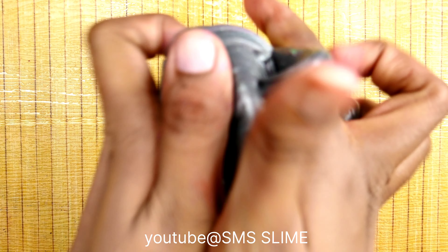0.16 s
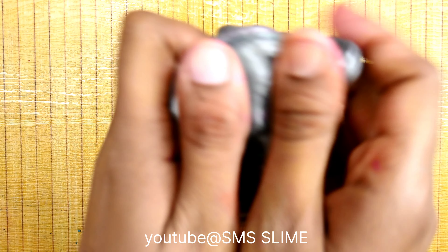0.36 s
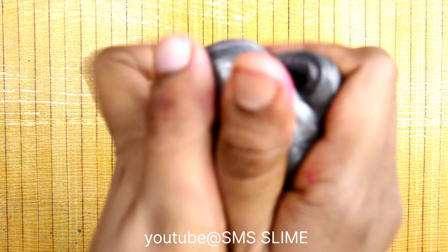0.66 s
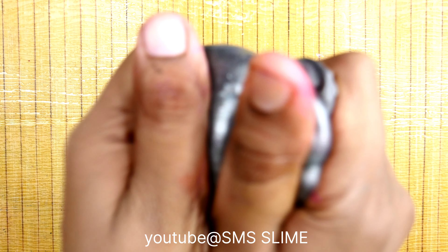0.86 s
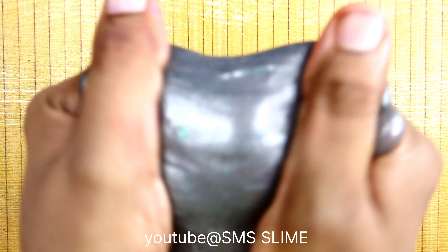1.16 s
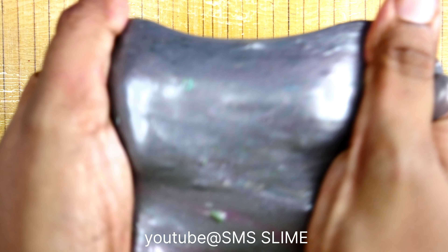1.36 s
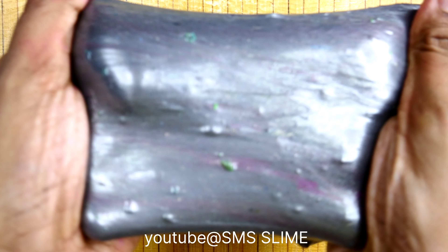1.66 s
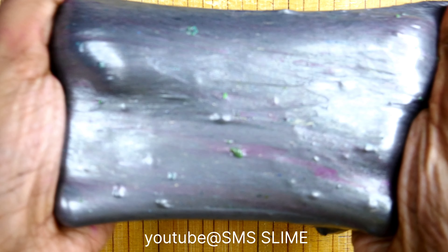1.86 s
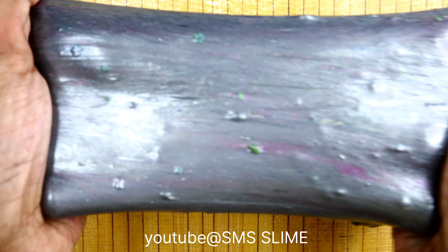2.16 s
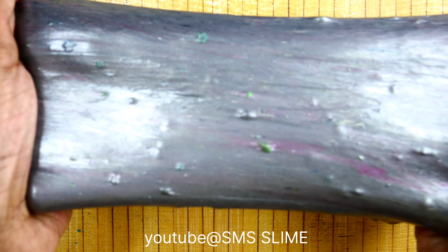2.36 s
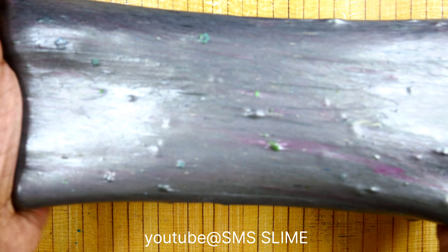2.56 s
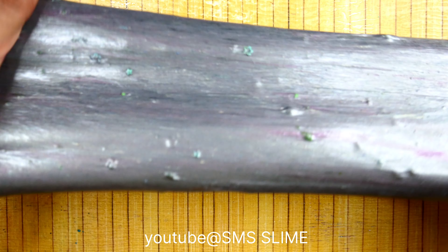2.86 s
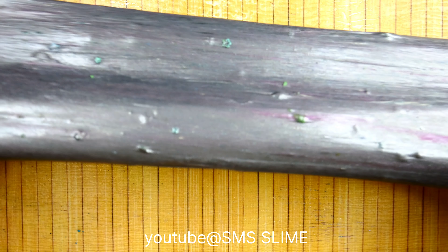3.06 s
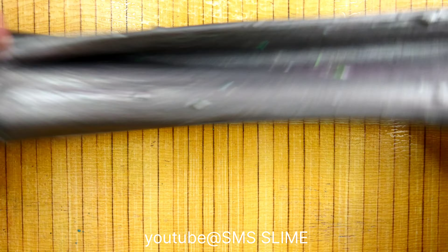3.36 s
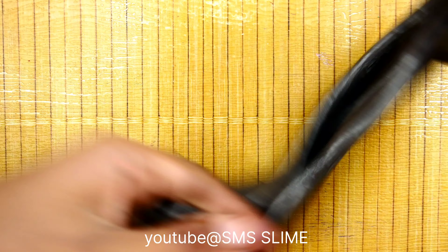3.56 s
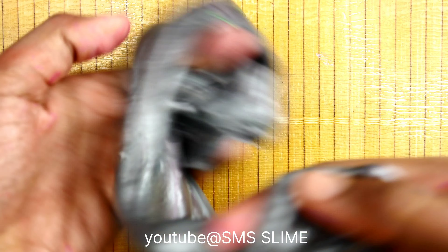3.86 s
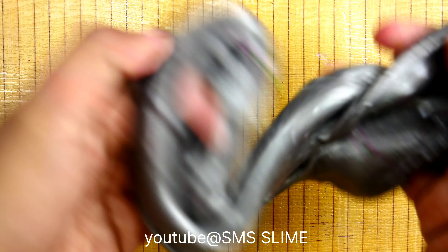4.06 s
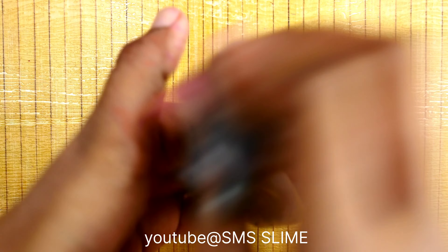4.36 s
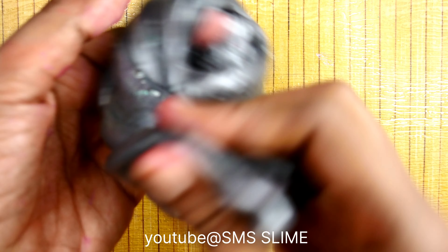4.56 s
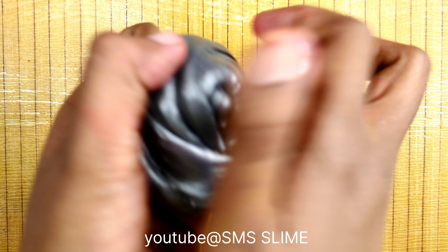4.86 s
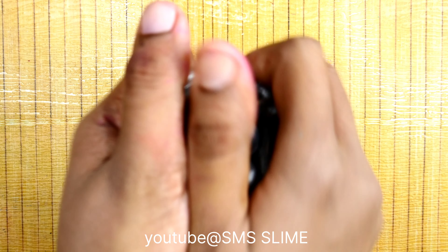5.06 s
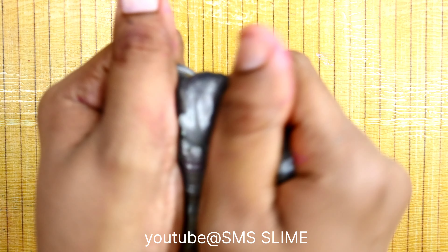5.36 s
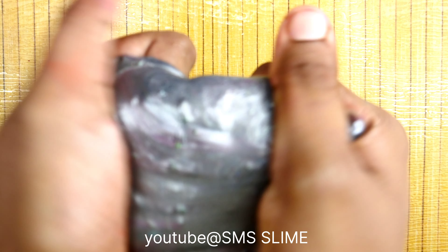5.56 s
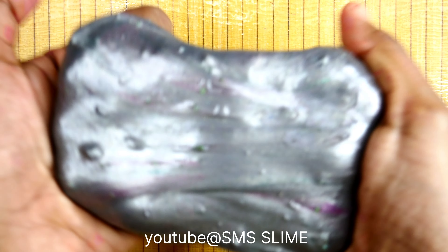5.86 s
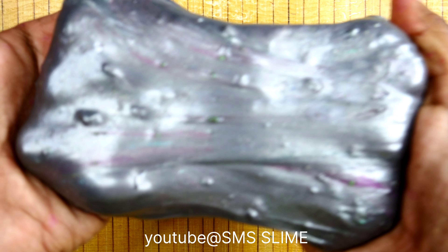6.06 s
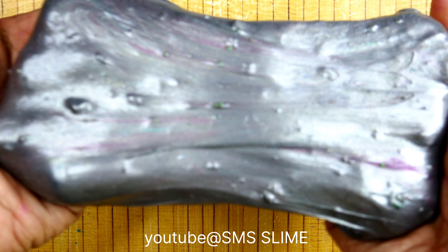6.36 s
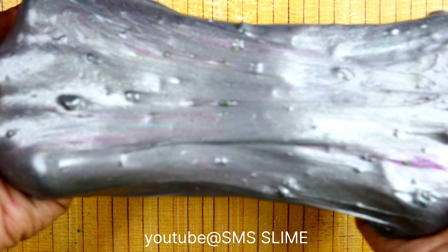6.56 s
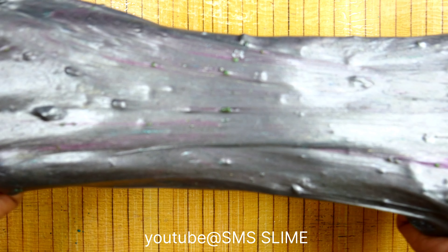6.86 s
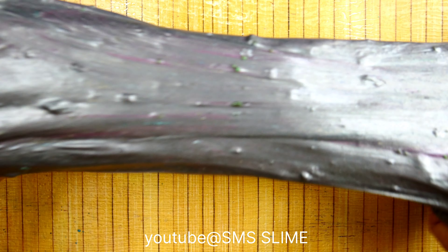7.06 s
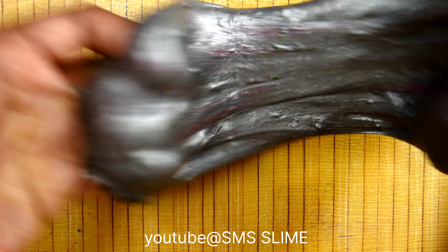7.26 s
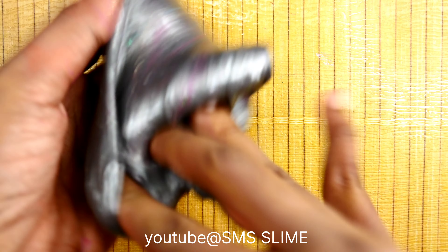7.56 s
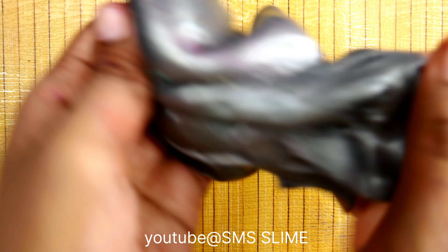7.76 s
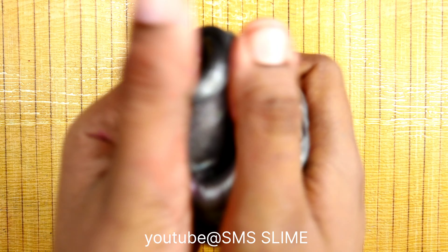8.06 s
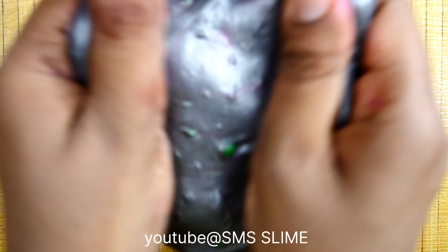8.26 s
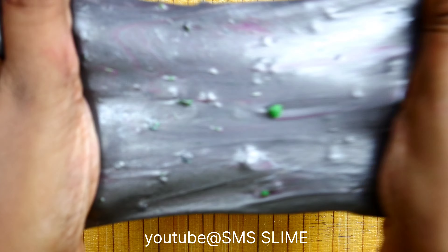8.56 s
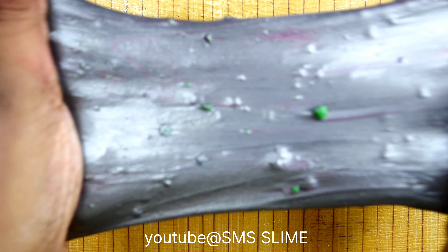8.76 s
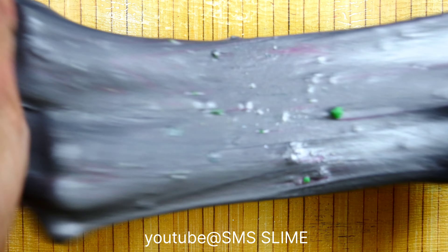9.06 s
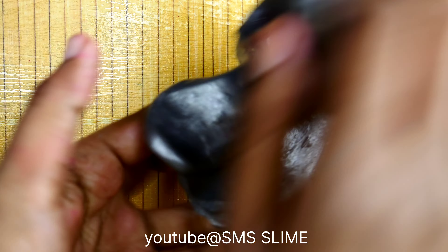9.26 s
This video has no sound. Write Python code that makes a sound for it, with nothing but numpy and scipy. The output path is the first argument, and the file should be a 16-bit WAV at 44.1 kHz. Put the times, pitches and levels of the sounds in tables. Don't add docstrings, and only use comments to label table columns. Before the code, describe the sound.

A lump of slime is squeezed, pulled and folded, snapping and crackling in uneven bursts between quiet stretches, with a soft motor hum behind.

```python
import sys
import numpy as np
from scipy import signal
from scipy.fft import rfft, irfft
from scipy.io import wavfile
from scipy.ndimage import uniform_filter1d

SR = 44100
rng = np.random.default_rng(int(sys.argv[2]) if len(sys.argv) > 2 else 0)


def decibels_to_gain(level_db):
    exponent = np.asarray(level_db, float) / 20
    return 10 ** exponent


def generate_wav(sig):
    pcm = np.round(np.clip(np.atleast_2d(sig).T, -1, 1) * 32767).astype(np.int16)
    wavfile.write(sys.argv[1], SR, pcm)


N = 414540

# start in seconds, peak in dB, pocket pitch in Hz,
# bright tear in dB.
POCKETS = [(0.606, -27, 3400, -4), (0.739, -31, 7570, -8), (0.791, -28.5, 3040, -4),
           (0.8448, -22, 3200, -6), (0.934, -25, 7800, -11), (1.562, -44, 8700, 5), (1.631, -25, 7950, -18),
           (3.037, -37.5, 6440, -1), (3.259, -47.5, 3650, -5), (4.11, -61, 7400, 5),
           (4.7394, -20, 5600, -6), (4.922, -37, 1160, -11), (5.254, -39, 5400, -8),
           (5.3298, -21.5, 2800, -20), (5.411, -25.5, 9450, -10), (5.933, -38.5, 2380, -9),
           (6.019, -24.5, 8240, -7), (6.816, -32, 3486, -15), (7.064, -40, 6600, -19),
           (7.082, -29, 6300, -6), (7.8398, -18.5, 3800, -18), (7.979, -38, 5660, -6),
           (7.981, -29, 5400, -11), (8.0075, -28, 8400, -10.5), (8.186, -39.5, 3000, -3),
           (8.514, -25, 2960, -12.5), (8.626, -22, 8040, -13)]
# start in seconds, peak in dB, pocket pitch in Hz, bright tear in dB.
CRACKS = [(0.138, -30, 3720, -11), (0.252, -30, 6600, -4), (0.266, -15.5, 6500, -10),
          (0.686, -26.5, 3830, -17), (1.059, -34, 2900, 2), (1.09, -31.5, 3040, -57),
          (2.2132, -22, 3000, -19), (0.8968, -28, 4540, 1.5), (3.069, -33, 7450, -15),
          (3.747, -41, 1950, -19), (3.83, -39, 2870, 0), (5.131, -34, 3260, -27), (5.203, -36, 3580, -5.5),
          (5.366, -27.5, 3060, -12), (5.4768, -30, 6860, -11), (5.62, -32, 2650, -1.5),
          (6.425, -43, 3000, -9)]
# start in seconds, peak in dB, pocket pitch in Hz,
# bright tear in dB.
SMACKS = [(0.127, -30, 3850, -4), (0.482, -32.5, 7400, -11), (0.943, -34, 8940, -12),
          (0.9572, -23, 2970, 2), (2.373, -46, 1320, -23), (2.571, -43.5, 1210, -23.5),
          (3.17, -31.5, 7000, -19), (3.282, -37, 776, -6.5), (3.5373, -36, 1700, -1.5),
          (4.942, -31, 2700, -11), (4.971, -35, 1250, 3), (5.277, -38, 900, -3), (5.3114, -18, 7650, -7),
          (7.5, -42.5, 1400, 2), (7.744, -42, 2250, -6), (7.825, -44, 1680, -11), (8.24, -38.5, 1250, -12),
          (8.792, -28.5, 8000, -12)]
# start in seconds, peak in dB, pitch in Hz.
TICKS = [(1.158, -42.5, 1190), (1.287, -48, 5000), (1.3337, -44.5, 2060), (1.6918, -42, 5400),
         (1.811, -44, 7000), (2.401, -62.5, 7600), (2.437, -57, 7500), (2.496, -70, 7800),
         (2.59, -47, 8000), (4.347, -36.5, 6500), (8.512, -34, 1600), (4.541, -43, 6460),
         (7.595, -39, 7000), (8.15, -38, 5500), (2.747, -52.5, 2490), (5.095, -37, 6160),
         (5.9158, -51, 2920), (6.107, -46, 4500), (6.263, -47, 2780), (6.726, -50, 3600),
         (7.334, -39, 2270), (7.39, -38.5, 1150), (8.265, -38.5, 6460), (8.4, -41.5, 8500),
         (8.4493, -44.5, 2910), (8.896, -42, 3940)]
# crack in dB, dull smack in dB.
POCKET_MIX_DB, CRACK_MIX_DB, SMACK_MIX_DB = (-17.5, -21.5), (-7.5, -19), (-8, -7.5)
SNAP_T60_S = 0.006
RUPTURE_RATIO = 4
# delay in seconds, level in dB.
TABLE_ECHOES = [(.0015, -7), (.0034, -9), (.0056, -14)]

# start in seconds, #
# peak in dB, centre in Hz.
STEPS = [(0.8973, -25, 4500), (0.9575, -17, 3200), (3.5378, -23, 3500), (4.7399, -21, 5500),
         (4.7431, -23, 5500), (5.2032, -36, 4000), (5.3121, -17, 6000), (5.3303, -17, 2300),
         (5.4773, -20.5, 4500), (7.8403, -19, 3600), (7.8424, -24, 3600), (8.0085, -30, 3800)]
STEP_WIDTH_RATIO, STEP_DB = 2.5, -1

# start in seconds, peak in dB,
# centre in Hz, length in seconds.
SPRAYS = [(0.090, -41, 8900, 0.0099), (0.333, -42, 3100, 0.006), (0.25, -38, 13500, .008),
          (0.267, -32, 13500, .004), (0.333, -36, 6000, 0.0037), (0.48, -42, 7200, .012),
          (0.605, -31, 7350, 0.009), (0.605, -35, 13500, 0.0087), (0.716, -42, 9000, .005),
          (0.789, -31, 7000, .008), (0.79, -27, 13500, 0.0076), (0.890, -38, 9000, 0.0054),
          (0.894, -41, 13000, .008), (0.928, -32, 6000, 0.0053), (0.945, -25, 6500, 0.0042),
          (0.958, -27, 14000, .008), (1.018, -38, 10000, .006), (1.054, -44, 9000, 0.0071),
          (1.562, -34, 13500, 0.0046), (1.63, -38, 13000, .006), (2.915, -41, 5000, 0.0072),
          (2.953, -41.5, 3200, 0.0093), (3.034, -32.5, 7000, 0.012), (3.085, -44.5, 10000, 0.0065),
          (3.174, -32.5, 6560, 0.022), (3.202, -46, 3500, .006), (3.364, -36, 7460, 0.0099),
          (3.41, -30, 7000, .008), (3.436, -33, 8300, .012), (3.537, -33, 13000, .006),
          (3.758, -43, 7500, .008), (4.650, -42.5, 6000, 0.0079), (4.668, -42.5, 10100, 0.011),
          (4.741, -21, 5000, 0.006), (4.739, -25, 13000, 0.0083), (4.827, -38, 3440, .008),
          (4.887, -44, 1500, 0.0044), (4.981, -29, 7500, 0.011), (5.075, -47, 3500, .006),
          (5.294, -36, 7000, .006), (5.3303, -33, 1300, .008), (5.367, -30, 7500, .005),
          (5.412, -23.5, 13000, 0.01), (5.49, -47, 7500, .004), (5.506, -37, 7960, .005),
          (5.563, -40, 8500, .005), (5.582, -41.5, 1950, 0.0077), (5.627, -35, 4500, 0.006),
               (7.178, -40, 5200, 0.0073), (7.19, -45, 7500, 0.0086), (7.288, -36, 6500, .008),
               (7.337, -43, 1800, 0.0043), (7.498, -39, 6800, .008), (7.51, -37, 5900, .01),
               (7.633, -43, 6400, 0.0066), (7.712, -40, 6200, .006), (7.788, -38, 7800, .006),
               (7.8, -38, 4100, .006), (8.158, -41.5, 6400, .006), (8.793, -44, 12000, .006),
               (9.023, -45, 5400, 0.0089), (9.390, -38, 2300, 0.013), (4.652, -48, 950, 0.016),
               (4.258, -53, 1150, 0.01), (3.798, -47, 420, 0.025), (8.793, -40, 700, 0.01),
               (3.281, -37, 1350, .014), (0.267, -19.5, 6000, .01), (6.54, -50.5, 3600, .005),
               (7.743, -37, 5300, .012), (7.76, -42, 10000, .006), (8.205, -41, 2500, 0.009),
               (8.205, -41, 7600, .006), (8.005, -29, 7800, 0.012), (0.267, -21, 3400, 0.009),
               (1.093, -35, 2460, 0.013), (3.158, -45, 2000, .02), (5.312, -20, 7800, 0.005),
               (3.281, -33, 5000, 0.014), (7.29, -42, 1040, 0.013), (5.3, -36, 3100, .006),
               (6.108, -43, 2800, 0.015), (6.29, -55, 5800, .012), (6.385, -53, 2300, .005),
               (3.5385, -35, 1500, 0.0058), (4.232, -47, 15000, .005), (4.382, -50, 11000, .005),
               (3.975, -42, 7500, 0.011), (0.118, -38, 3700, .012), (4.8, -41, 13000, 0.0065)]
SPRAY_WIDTH_RATIO = 1.3

# start in seconds, peak in dB, cavity pitch in Hz,
# length in seconds, hiss in dB.
SQUELCHES = [(0.078, -33, 9000, 0.046, 2.5), (0.1255, -22.5, 3660, 0.042, -15),
             (0.681, -27, 3900, 0.022, -17), (0.927, -28, 8500, 0.08, -22), (2.866, -36, 3220, 0.015, -16),
             (3.426, -26.5, 2780, 0.028, -6), (3.747, -33.5, 2020, 0.052, 3),
             (3.784, -29.5, 2010, 0.023, 0.5), (3.833, -28, 2970, 0.033, 3), (3.965, -37, 2830, 0.032, 3),
             (4.133, -31.5, 4350, 0.066, -1), (4.789, -30.5, 3520, 0.029, -1), (4.934, -25, 2670, 0.072, 0),
             (5.3, -19.5, 8350, 0.018, -2.5), (6.784, -40, 3530, 0.051, -30), (7.201, -32, 2680, 0.07, -19),
             (7.247, -34, 2760, 0.041, -21), (7.825, -23, 3740, 0.03, 0.5), (9.146, -39, 4140, 0.013, -14),
             (9.349, -37.5, 1840, 0.012, -10.5)]
# start in seconds, peak in dB, cavity pitch in Hz, length in seconds, hiss in dB.
GULPS = [(0.124, -32.5, 475, 0.013, -2), (0.475, -36, 497, 0.016, -11), (0.265, -27, 956, 0.009, -9),
         (0.612, -40, 600, 0.016, -21), (7.834, -28.5, 1200, 0.024, -7), (3.284, -24, 730, 0.013, -20),
         (4.729, -28, 800, 0.0046, -13), (4.964, -27, 1250, 0.023, -22), (5.31, -29, 520, 0.014, -3.5),
         (7.514, -34, 1400, 0.015, -3), (8.233, -36, 1110, 0.019, -15), (9.234, -37, 565, 0.011, -3)]

# peak time in seconds, fine crackle in dB,
# mid crackle re fine in dB, wet squelch re fine in dB, time to fade 20 dB in seconds.
TUGS = [(0.274, -49.5, -2.5, -10, 0.46), (0.808, -55.5, -2, -12, 0.2), (1.656, -57.5, -2.5, -9, -0.68),
        (2.835, -57, -7.5, -13, 1.2), (2.883, -54.5, 0, -18, 0.6), (3.178, -49, -8, -29, 0.12),
        (3.283, -42.5, -5.5, -14, 0.12), (3.766, -48, -19, -8.5, -0.06), (4.111, -49, -11, -27, 0.1),
        (4.265, -58, -0.5, -9, 0.16), (4.659, -52, -3, -15, .06), (4.749, -47, 0.5, -2.5, 0.06),
        (4.944, -53, 2.5, -21, 0.23), (5.323, -47, -1, -5.5, 0.24), (6.116, -61.5, 1.5, -8, 0.12),
        (6.81, -59, -3, -7.5, 0.13), (7.084, -49, -11.5, -8.5, 0.1), (7.205, -44, -4, -14, 0.22),
        (7.29, -47, -8, -6, -0.12), (7.513, -56, -4, -5.5, 0.6), (7.997, -50.5, 0, -23, 0.12),
        (8.635, -59, -3, -7, 0.1), (8.805, -60.5, -2, 0.5, 0.24), (9.399, -56.5, 8.5, -2, 8)]
# peak time in seconds, fine crackle in dB,
# mid crackle re fine in dB, wet squelch re fine in dB, time to fade 20 dB in seconds.
PULLS = [(0.03, -62.5, 6.5, -8, 0.2), (0.14, -54, -3.5, -4, 0.15), (0.479, -56, -4, -1.5, 0.26),
         (0.693, -49.5, -3, -2.5, 0.07), (0.953, -52, 1, -6, 0.43), (1.137, -71.5, 2.5, -11, 2),
         (3.432, -43.5, -3, -13, 0.12), (3.846, -52, 1.5, -5.5, 0.18), (4.001, -60.5, -2.5, -4.5, 1),
         (4.979, -46, -3, -6.5, 0.12), (5.123, -58, -0.5, -11, 0.5), (5.443, -51.5, -3, -11, 0.5),
         (5.627, -72, -9, -26, 0.5), (6.031, -53.5, -2.5, -17, 0.08), (7.393, -53, -5.5, -3.5, 0.1),
         (7.842, -48, 1.5, -34, .12), (8.191, -59.5, -2, -3, 0.76), (9.094, -46, -9, -11, 0.18),
         (9.16, -46, -2, -14, 0.2), (9.229, -47.5, -1, -3.5, .09)]
TUG_RISE_DB_PER_S, PULL_RISE_DB_PER_S = 398, 150
REST_DB = (-78, -73.5, -72.5)
# lowest pitch in Hz, highest pitch in Hz, ring in cycles,
# size spread in dB.
GRAINS = [(2400, 4700, 19, 1.5), (5700, 10300, 24, 1.5), (520, 1900, 11, 2)]
GRAINS_PER_S = 6000
BEADS_PER_S, BEADS_DB = 260, -11
PATCHY_DB = 3.4

ROOM_T60_S, ROOM_DB, WALL_CUT_HZ = 0.31, -13.5, 21000
LEFT_DB = 0.48

# frequency in Hz, rms level in dB.
HUM = [(102.3, -60), (199.2, -63.5), (296.1, -73.5), (398, -80)]
# time in seconds, pitch in Hz, level in dB.
WHINE = [
    [(3.64, 1380, -63), (3.75, 1374, -65), (3.9, 1330, -68), (4.05, 1385, -62), (4.3, 1365, -68.5),
     (4.46, 1350, -66)],
    [(4.35, 790, -78), (4.42, 767, -66), (4.7, 698, -67)],
    [(7.05, 1287, -69), (7.25, 1350, -69), (7.5, 1306, -68), (7.95, 1390, -67), (8.05, 1380, -76)],
    [(7.65, 786, -73), (7.8, 774, -66), (8.0, 765, -69)],
]
# time in seconds, level in dB.
TRAFFIC = [
    (7.6, -51),
    (7.794, -70),
    (8.256, -45.5),
    (9.294, -45.5),
    (9.4, -48),
]
# frequency in Hz, width in Hz, level in dB.
TRAFFIC_MODES = [(66, 1.9, 0), (99, 9.6, 0), (151.2, 74, -0.5), (186, 68, -4.5), (394, 16, -13)]
# frequency in Hz, density in dB per Hz.
AIR = [(12, -48), (20, 0), (102, -4.5), (165, -4), (200, 0), (224, -15), (258, -12.5), (323, -11.5),
       (506, -29.5), (794, -28), (2310, -31.5), (2890, -33.5), (4530, -38), (15200, -39), (16500, -60)]
# frequency in Hz, correlation from 0 to 1.
LIKENESS = [(60, 0.98), (180, 0.99), (550, 0.95), (1650, 0.85), (4970, 0.59), (15000, 0.6)]
AIR_DB = -53.5


def in_time(rows):
    s, *columns = np.transpose(rows)
    return [np.interp(np.arange(N) / SR, s, c) for c in columns]


def at_hz(points, hz):
    points_hz, values = np.transpose(points)
    return np.interp(np.log(hz), np.log(points_hz), values)


def rms_one(x):
    return x / np.sqrt(np.mean(x ** 2) + 1e-20)


def peak_one(x):
    return x / np.abs(x).max()


def drift(rate_hz):
    r = np.exp(-80 * np.pi * rate_hz / SR)
    white = rng.standard_normal(N // 40 + 2002)
    slow = signal.lfilter([1], [1, -2 * r, r * r], white)[2000:]
    return np.interp(np.arange(N) / 40, np.arange(len(slow)), rms_one(slow))


def ring(x, hz, t60_s):
    r = 10 ** (-3 / (t60_s * SR))
    w = 2 * np.pi * hz / SR
    return signal.lfilter([0, np.sin(w)], [1, -2 * r * np.cos(w), r * r], x + 1e-18)


def band(x, low_hz, high_hz):
    edges_hz = [low_hz, min(high_hz, .45 * SR)]
    return signal.sosfilt(signal.butter(2, edges_hz, "band", fs=SR, output="sos"), x)


def place(out, start_s, burst):
    at = round(start_s * SR)
    out[at:at + len(burst)] += burst


def pops():
    size = 2048
    out, t = np.zeros(N + size), np.arange(size) / SR
    rows = [(s, db, hz, -14, -14, -26) for s, db, hz in TICKS]
    kinds = (POCKETS, POCKET_MIX_DB), (CRACKS, CRACK_MIX_DB), (SMACKS, SMACK_MIX_DB)
    for table, (crack_db, smack_db) in kinds:
        rows += [(s, db, hz, crack_db, tear_db, smack_db) for s, db, hz, tear_db in table]

    noise = rng.standard_normal((len(rows), 4, size))
    noise[:, :, 0] = RUPTURE_RATIO
    spacing = rng.uniform(0.6, 1.4, (len(rows), len(TABLE_ECHOES), 1))
    fade = decibels_to_gain(-60 * t / SNAP_T60_S) + 0.37 * decibels_to_gain(-60 * t / 0.054)
    for k, (lag_s, db) in enumerate(TABLE_ECHOES):
        since_s = t - spacing[:, k] * lag_s
        fade = fade + decibels_to_gain(db - 60 * np.abs(since_s) / 0.006) * (since_s > 0)
    pocket, crack, tear, smack = np.moveaxis(noise * fade[:, None], 1, 0)
    crack = band(band(crack, 2690, 4550), 1900, 16000)
    tear = band(band(tear, 4900, 11600), 5200, 21700)
    smack = band(smack, 484, 2300)

    for k, (s, peak_db, hz, *parts_db) in enumerate(rows):
        ringing = ring(ring(pocket[k], hz, 7 / hz), hz, 4 / hz)
        burst = decibels_to_gain(-5) * peak_one(band(ringing, hz / 1.5, hz * 2))
        for db, part in zip(parts_db, (crack, tear, smack)):
            burst += decibels_to_gain(db) * peak_one(part[k])
        place(out, s + .0006, decibels_to_gain(peak_db + 1.5) * burst)
    return out[:N]


def steps():
    size = 512
    out, click = np.zeros(N + size), np.zeros(size)
    click[0] = -1
    for lag_s, db in TABLE_ECHOES:
        click[round(lag_s * SR)] = -decibels_to_gain(db)
    for s, peak_db, hz in STEPS:
        step = peak_one(band(click, hz / STEP_WIDTH_RATIO, hz * STEP_WIDTH_RATIO))
        place(out, s, decibels_to_gain(peak_db + STEP_DB) * step)
    return out[:N]


def sprays():
    size = 2048
    out, t = np.zeros(N + size), np.arange(size) / SR
    films = SPRAYS
    noise = rng.standard_normal((len(films), 2, size))
    for (s, peak_db, hz, length_s), (jet, sizes) in zip(films, noise):
        age = t / np.clip(0.25 * length_s, .0005, .01)
        rip = jet * decibels_to_gain(5.3 * sizes) * age * np.exp(-age)
        rip = peak_one(band(rip, hz / SPRAY_WIDTH_RATIO, hz * SPRAY_WIDTH_RATIO))
        place(out, s, decibels_to_gain(peak_db) * rip)
    return out[:N]


def squelches():
    size = 8192
    out, t = np.zeros(N + size), np.arange(size) / SR
    gaps = SQUELCHES + GULPS
    noise = rng.standard_normal((len(gaps), 3, size))
    for (s, peak_db, hz, length_s, hiss_db), (jet, hiss, lumps) in zip(gaps, noise):
        age = t / np.clip(0.41 * length_s, .002, .03)
        sputter = decibels_to_gain(2.9 * rms_one(uniform_filter1d(lumps, size=90)))
        swell = age ** 1.18 * np.exp(-1.5 * age) * sputter
        cycles = np.clip(-hiss_db, 9, 30)
        cavity = peak_one(ring(ring(jet * swell, hz, cycles / hz), hz, 8 / hz))
        leak = decibels_to_gain(hiss_db) * peak_one(band(hiss * swell, 1000, 7100))
        place(out, s, decibels_to_gain(peak_db - 8.5) * (cavity + leak))
    return out[:N]


def peeling_db():
    t = np.arange(0, N + 64, 64) / SR
    power = decibels_to_gain(np.array(REST_DB))[:, None] ** 2 + 0 * t
    for rows, rise_db_per_s in (TUGS, TUG_RISE_DB_PER_S), (PULLS, PULL_RISE_DB_PER_S):
        for s, db, mid_db, wet_db, fade_s in rows:
            rise_db = (s - t) * rise_db_per_s
            fade_db = (t - s) * 20 / max(fade_s, .01)
            shape_db = db - np.maximum(rise_db, fade_db)
            power = power + decibels_to_gain(shape_db + np.array([[mid_db], [0], [wet_db]])) ** 2
    return [np.interp(np.arange(N) / SR, t, 10 * np.log10(p)) for p in power]


def peel():
    out, clump_db, levels_db = 0, drift(40), peeling_db()
    for level_db, (low_hz, high_hz, cycles, spread_db) in zip(levels_db, GRAINS):
        sizes = decibels_to_gain(spread_db * np.minimum(rng.exponential(1, N), 5)) * rng.choice([-1, 1], N)
        snaps = sizes * (rng.random(N) < GRAINS_PER_S / SR)
        large = sizes * (rng.random(N) < BEADS_PER_S / SR)
        beads = rms_one(band(large, low_hz, 1.56 * high_hz))
        dealt = rng.integers(0, 11, N)
        rings = 0
        for k, hz in enumerate(np.geomspace(low_hz, high_hz, 11)):
            rings = rings + decibels_to_gain(PATCHY_DB * drift(13)) * ring(snaps * (dealt == k), hz, cycles / hz)
        out = out + decibels_to_gain(level_db + 1.7 * clump_db) * (rms_one(rings) + decibels_to_gain(BEADS_DB) * beads)
    hiss = rms_one(band(rng.standard_normal(N), 12800, 17000))
    hiss_db = levels_db[1] - 10.0 + 0.55 * clump_db + 1.3 * drift(6.3)
    return out + decibels_to_gain(hiss_db) * hiss


def ports(x):
    treble = signal.sosfilt(signal.butter(2, 5000, "high", fs=SR, output="sos"), x)
    side = drift(150) * np.roll(treble, 5) + drift(150) * np.roll(treble, 13)
    side = side + decibels_to_gain(-7.0) * drift(60) * band(x, 550, 2400)
    return x + decibels_to_gain(-13) * side * [[1], [-1]]


def room(x):
    t = np.arange(round(.6 * SR)) / SR
    noise = rng.standard_normal((2, 2, len(t)))
    dull = signal.sosfilt(signal.butter(1, WALL_CUT_HZ, fs=SR, output="sos"), noise[0])
    tail = dull * decibels_to_gain(-60 * t / ROOM_T60_S) + 0.61 * noise[1] * decibels_to_gain(-60 * t / (0.78 * ROOM_T60_S))
    tail = tail * np.clip((t - .003) / 0.014, 0, 1)
    spectrum = rfft(tail, axis=1)
    smooth = uniform_filter1d(np.abs(spectrum) ** 2, size=200, axis=1)
    tail = irfft(spectrum / np.sqrt(smooth), len(t), axis=1)
    tail[1] = 1.09 * tail[0] + 0.26 * tail[1]
    tail = tail / np.sqrt(np.sum(tail[0] ** 2))
    return signal.fftconvolve(x[None], tail, axes=1)[:, :N]


def hum():
    t, out = np.arange(N) / SR, 0
    for hz, db in HUM:
        tone = np.cos(2 * np.pi * hz * t + 0.87 * drift(1.37))
        out = out + decibels_to_gain(db + 3.3 * drift(7.9)) * np.sqrt(2) * tone
    return out


def whine():
    out, t = 0, np.arange(N) / SR
    for rows in WHINE:
        hz, db = in_time(rows)
        lasting = np.clip(np.minimum(t - rows[0][0], rows[-1][0] - t) / 0.025, 0, 1)
        waver = decibels_to_gain(4.5 * drift(25) - 4)
        phase = 2 * np.pi * np.cumsum(hz + 16 * drift(18.0)) / SR
        out = out + lasting * waver * decibels_to_gain(db) * np.sin(phase)
    return out


def traffic():
    white = rng.standard_normal(N)
    boom = sum(decibels_to_gain(db) * rms_one(ring(white, hz, 2.2 / width_hz)) for hz, width_hz, db in TRAFFIC_MODES)
    boom = signal.sosfilt(signal.butter(2, 260, fs=SR, output="sos"), boom)
    rise = np.clip((np.arange(N) / SR - 7.9) / 0.24, 0, 1)
    return rise * decibels_to_gain(in_time(TRAFFIC)[0]) * rms_one(boom)


def air():
    out, edges_hz = 0, 20 * 2 ** np.arange(0, 9.8, .4)
    white = rng.standard_normal((2, 2, N))
    for k, (low_hz, high_hz) in enumerate(zip(edges_hz, edges_hz[1:])):
        mid, side = band(white[k % 2], low_hz, high_hz)
        hz = np.sqrt(low_hz * high_hz)
        alike = np.clip(at_hz(LIKENESS, hz), -1, 1)
        gain = decibels_to_gain(at_hz(AIR, hz) + 0.43 * drift(15))
        out = out + gain * (np.sqrt(1 + alike) * mid + np.sqrt(1 - alike) * side * [[1], [-1]])
    return decibels_to_gain(AIR_DB) * rms_one(out)


def scene():
    slime = pops() + squelches() + peel() + sprays() + steps()
    centre = ports(slime) + hum() + traffic() + whine()
    balance = decibels_to_gain(np.array([[LEFT_DB / 2], [-LEFT_DB / 2]]))
    return (centre + decibels_to_gain(ROOM_DB) * room(slime) + air()) * balance


def roll_off(x):
    return signal.sosfilt(signal.butter(12, 16840, fs=SR, output="sos"), x)


def record(dry):
    cut = signal.sosfilt(signal.butter(6, 36, "high", fs=SR, output="sos"), dry)
    cut = signal.sosfilt(signal.cheby2(14, 40, 16050, fs=SR, output="sos"), cut)
    return roll_off(cut)


dry = scene()
out = record(dry)
generate_wav(out)
```